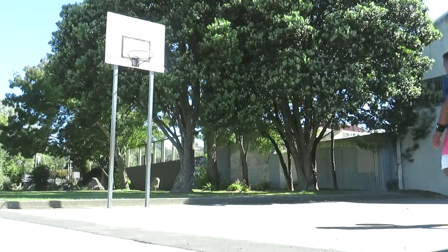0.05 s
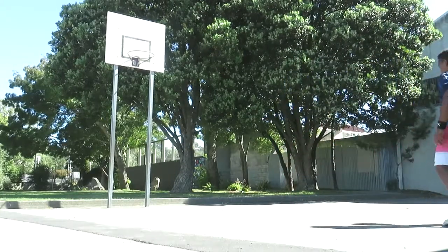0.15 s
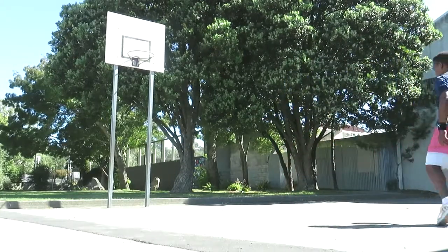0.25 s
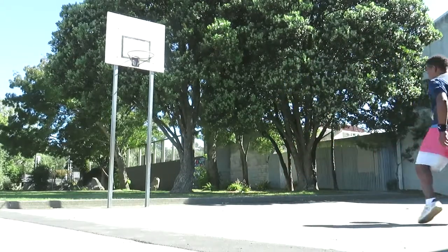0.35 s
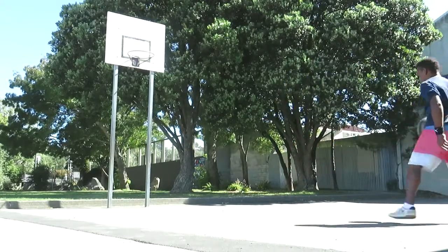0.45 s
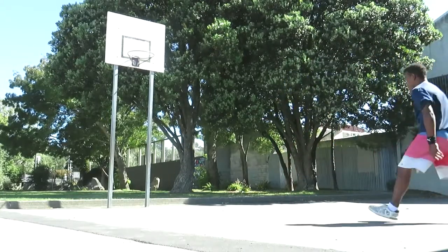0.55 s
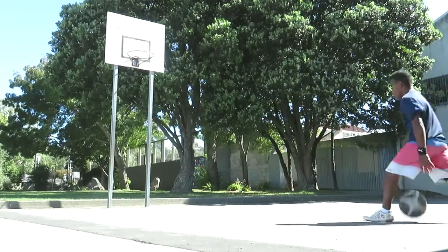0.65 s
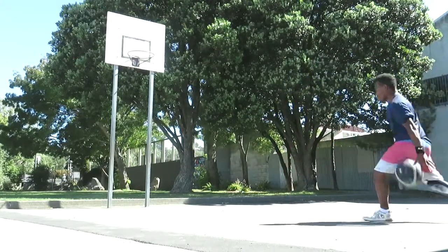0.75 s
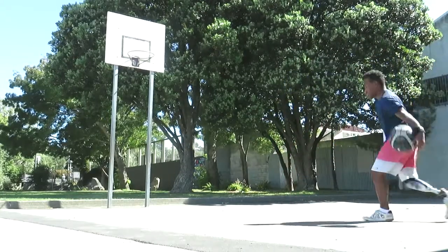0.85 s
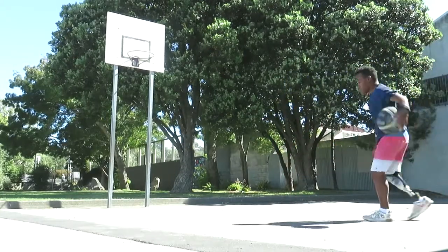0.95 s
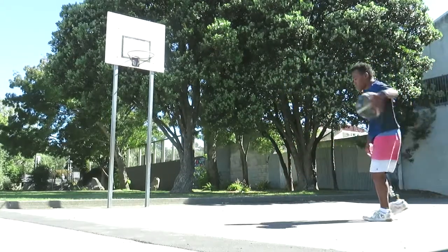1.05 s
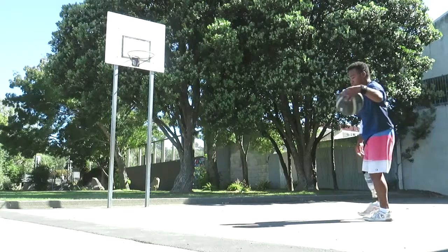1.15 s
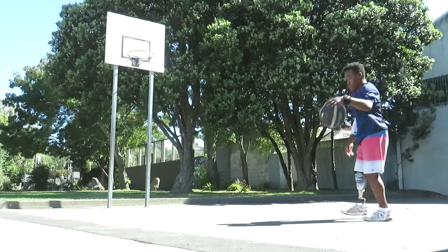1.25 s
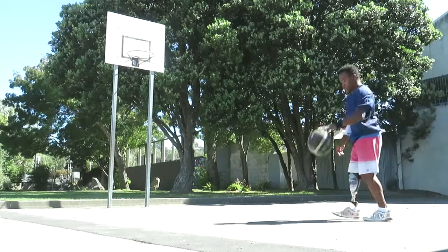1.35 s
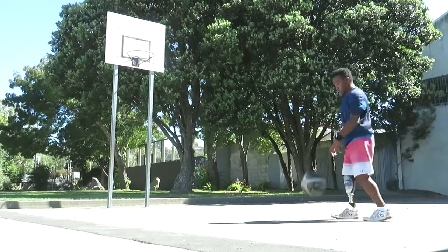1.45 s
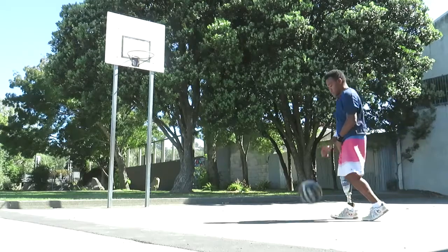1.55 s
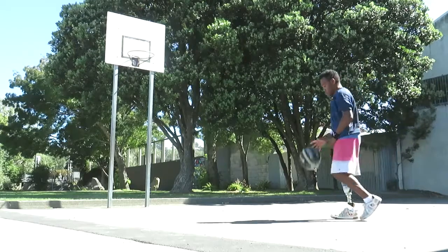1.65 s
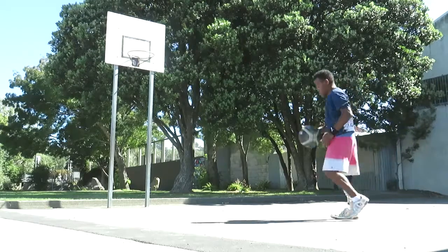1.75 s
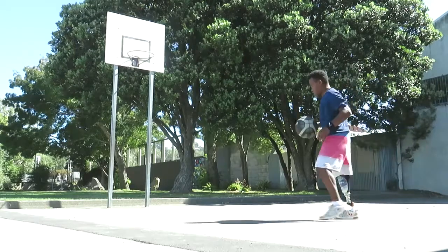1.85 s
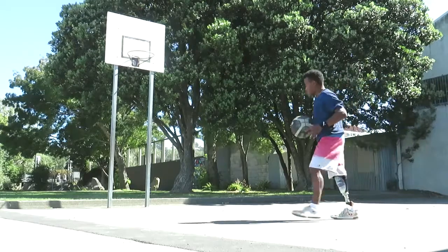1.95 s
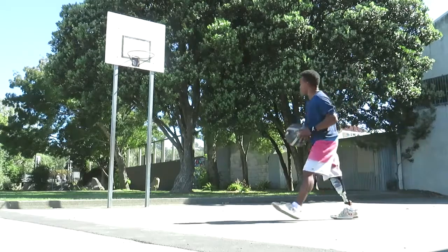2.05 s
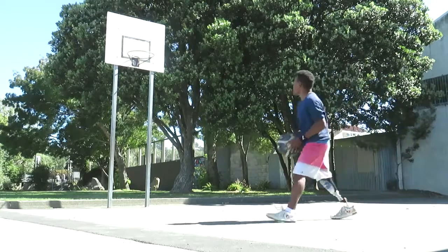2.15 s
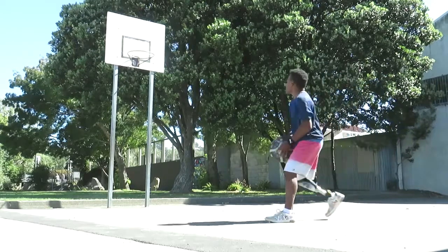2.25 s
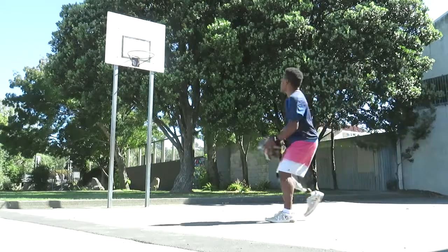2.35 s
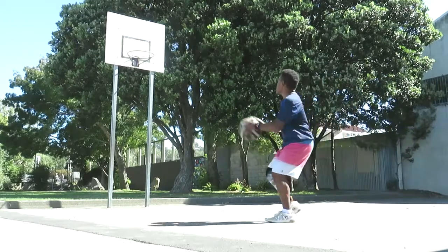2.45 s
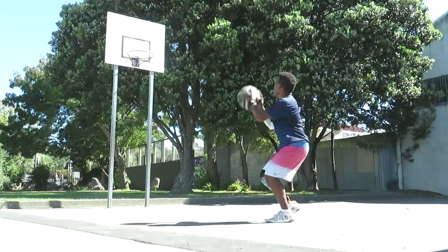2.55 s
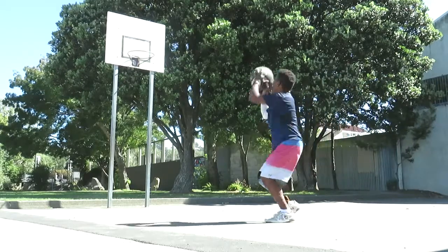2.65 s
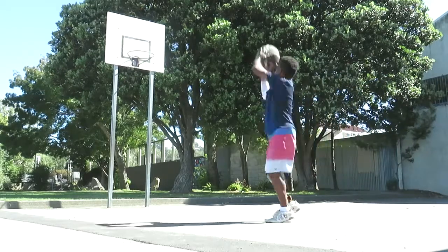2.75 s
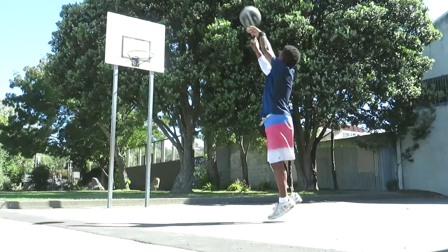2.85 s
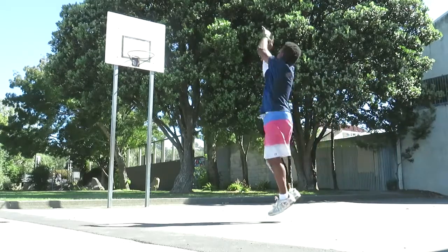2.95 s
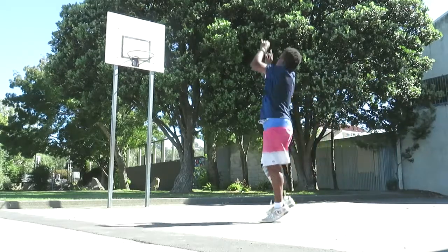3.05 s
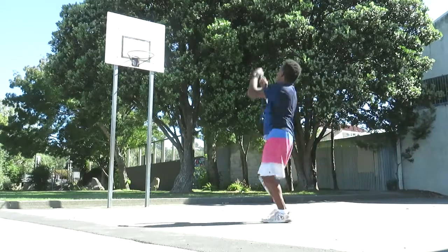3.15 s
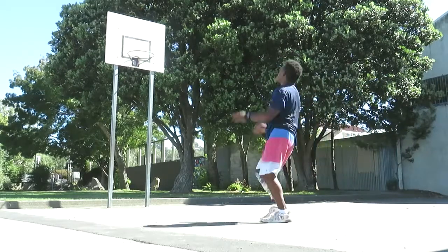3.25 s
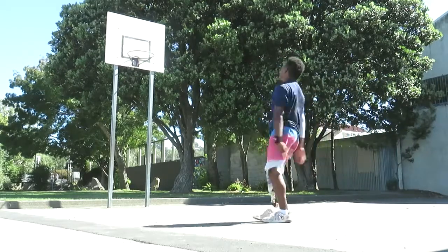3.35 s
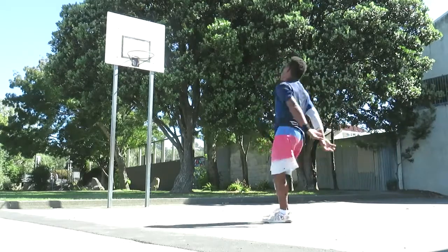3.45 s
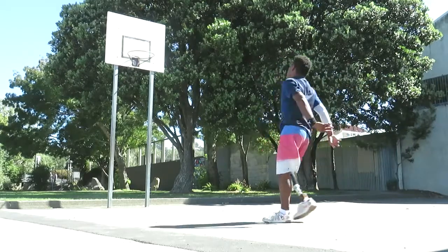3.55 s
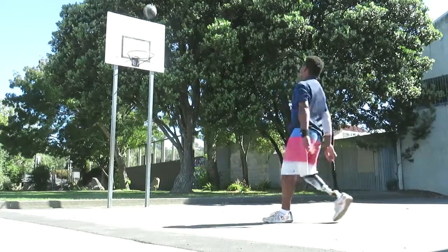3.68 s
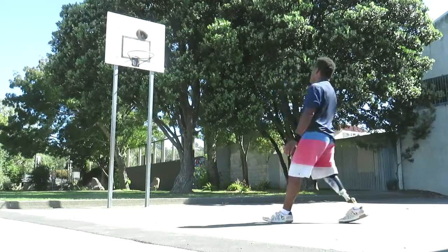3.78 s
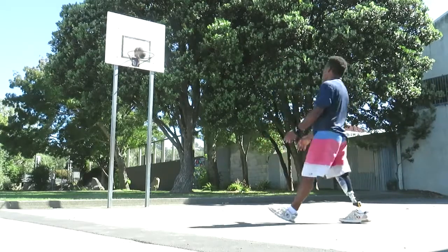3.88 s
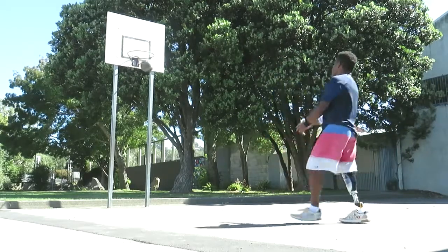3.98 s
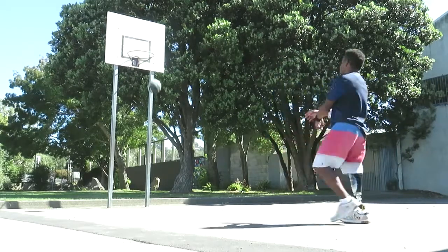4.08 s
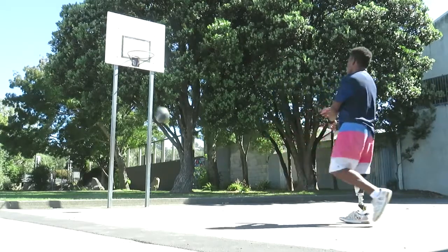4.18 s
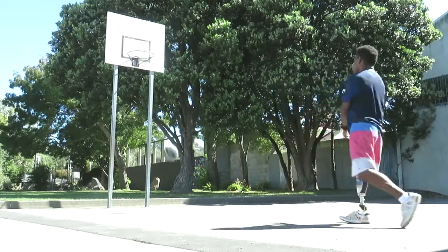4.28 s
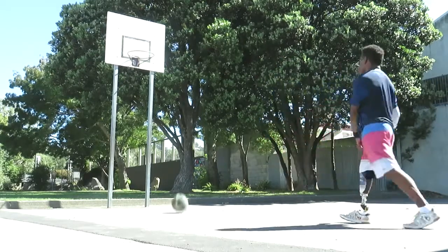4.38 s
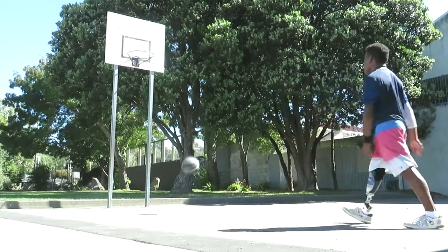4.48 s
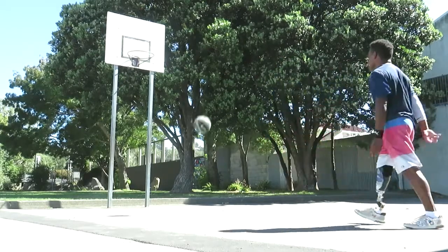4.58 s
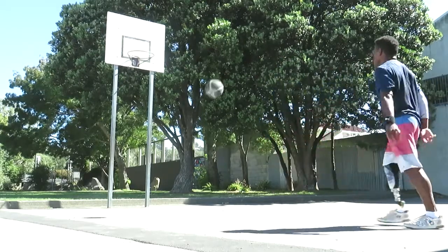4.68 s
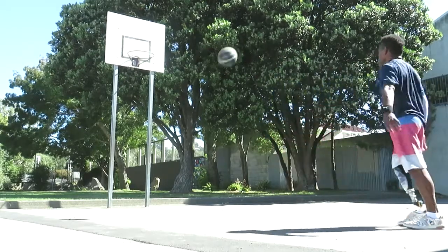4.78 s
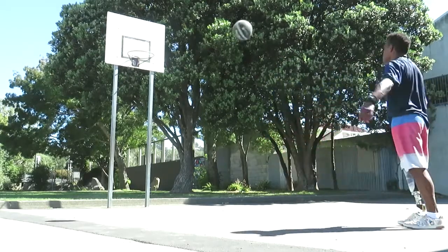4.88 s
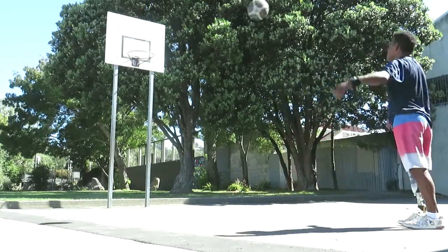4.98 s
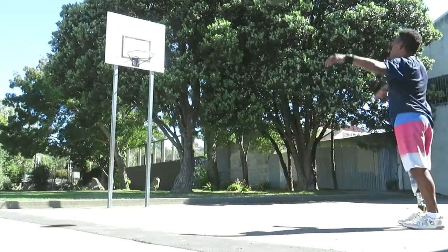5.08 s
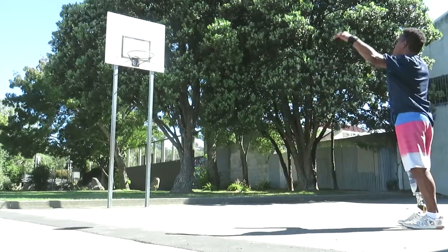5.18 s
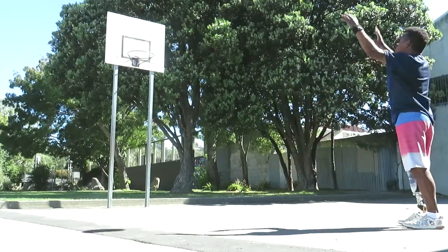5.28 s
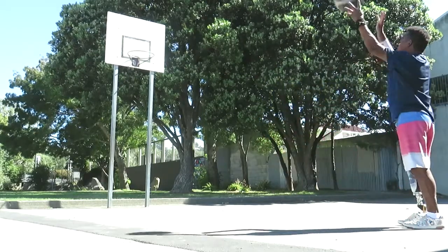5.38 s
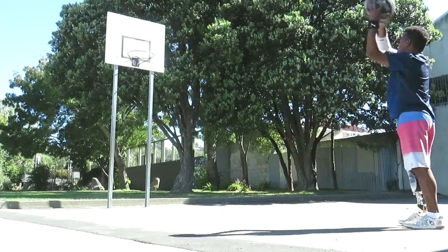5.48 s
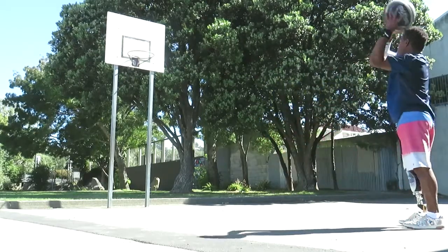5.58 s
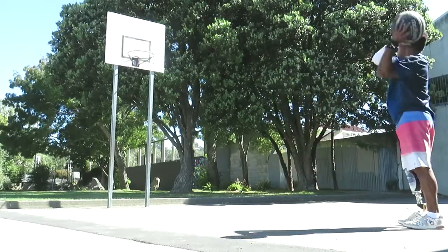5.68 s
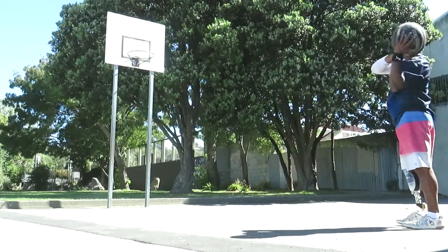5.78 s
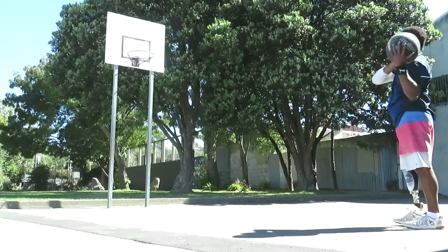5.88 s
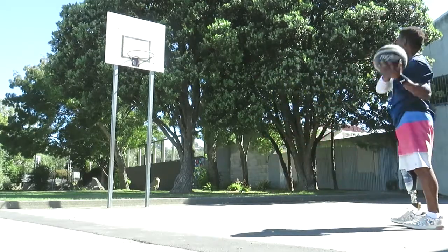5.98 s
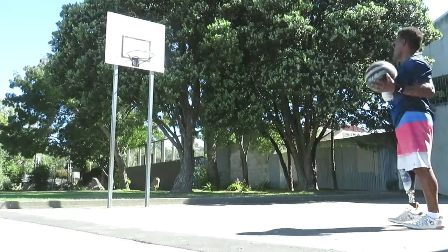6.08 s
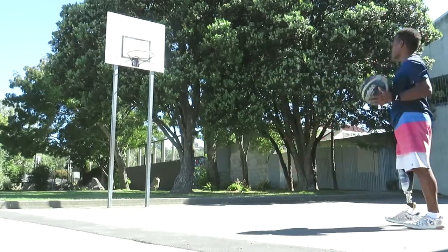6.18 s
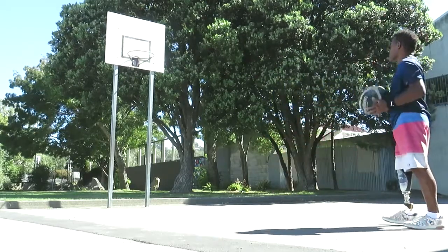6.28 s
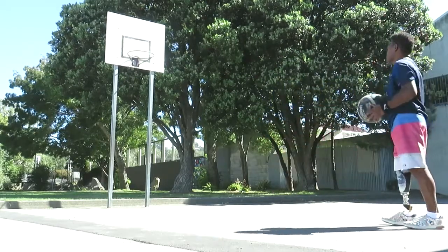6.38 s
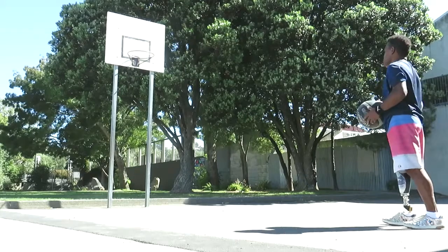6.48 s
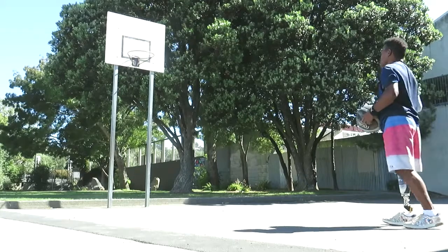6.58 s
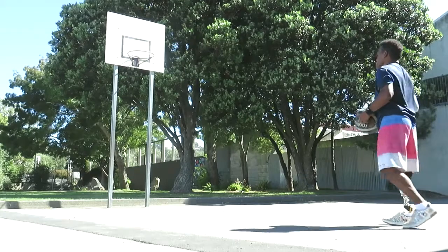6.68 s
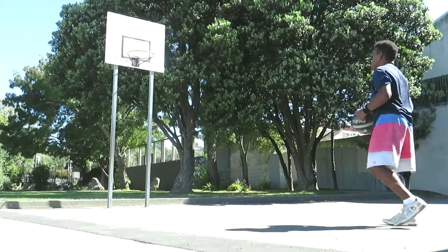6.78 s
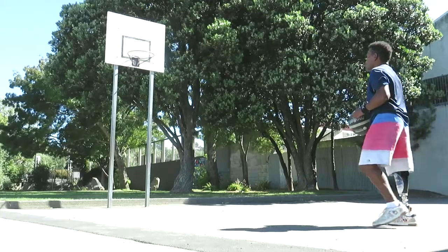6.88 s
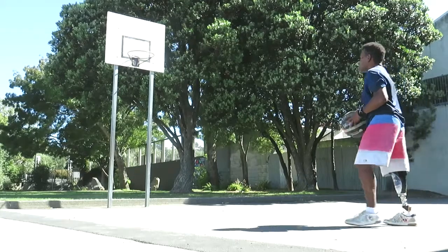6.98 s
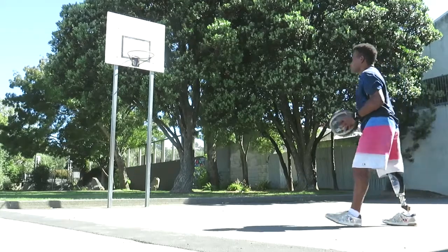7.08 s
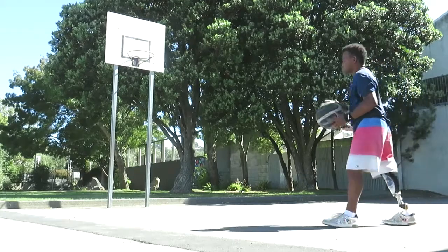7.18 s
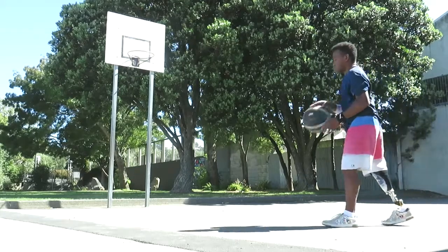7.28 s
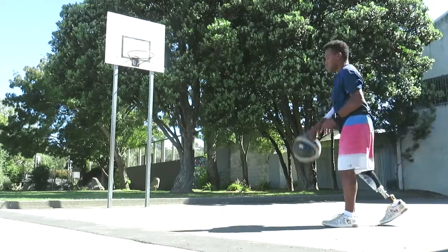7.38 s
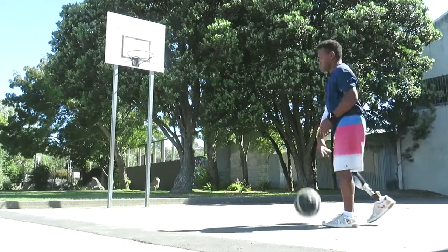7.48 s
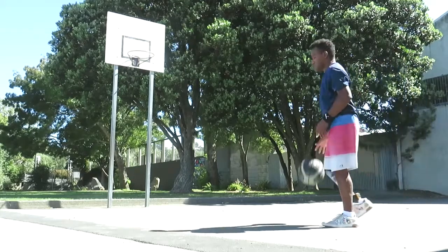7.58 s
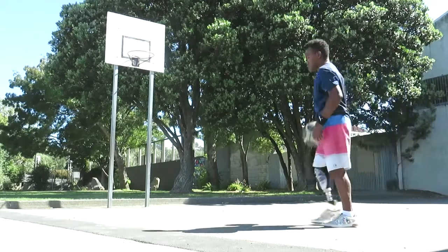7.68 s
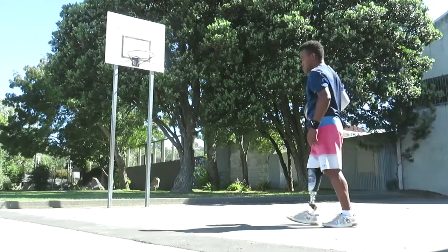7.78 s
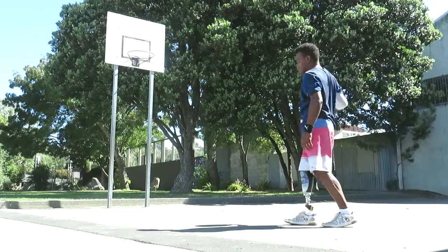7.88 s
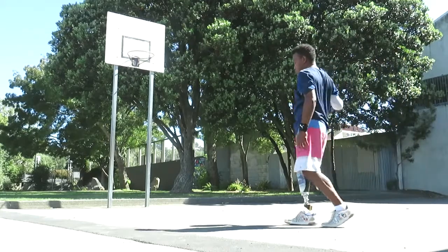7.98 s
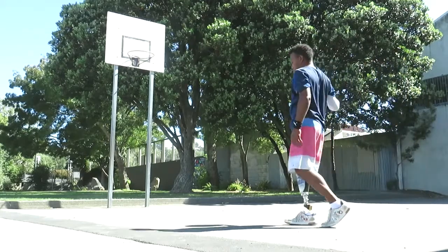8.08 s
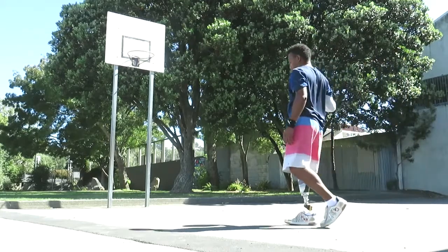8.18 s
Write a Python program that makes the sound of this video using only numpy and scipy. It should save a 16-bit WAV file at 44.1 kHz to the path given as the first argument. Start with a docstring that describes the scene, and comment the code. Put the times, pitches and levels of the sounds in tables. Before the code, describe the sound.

Hard, hollow basketball bounces echo off a nearby wall, with one rattling backboard hit, a hand clap catch, buzzing cicadas and low wind rumble.

```python
"""Basketball on an outdoor asphalt court

The ball bounces twice, strikes backboard and rim, bounces again, is caught, and bounces a last time.
Each hit is built from filtered noise bursts and damped sines; shoes tap and scuff on grit.
A wall behind the court throws bounces, hands and feet back, and trees return a wash.
Shaped noise makes the cicadas that swell and break off in the trees, the distant town rumble,
a thin pulsing hiss at the top of the treble, a brief swish and the gusts that buffet the microphone."""
import sys
import numpy as np
from scipy import signal
from scipy.fft import rfft, irfft
from scipy.io import wavfile

SR = 44100
rng = np.random.default_rng(int(sys.argv[2]) if len(sys.argv) > 2 else 0)


def master(y):
    """Save y as 16-bit WAV."""
    cut = np.clip(np.atleast_2d(y).T, -1, 1)
    pcm = np.round(cut * 32767)  # scale
    wavfile.write(sys.argv[1], SR, pcm.astype(np.int16))


N = 362943
TIME = np.arange(N) / SR  # the whole scene (s)
T = np.arange(SR) / SR  # one second, for single sounds (s)
HZ = np.fft.rfftfreq(N, 1 / SR)

# colour of the court's reflections: freq_hz, level_db
ECHO_COLOUR = [(60, -13), (300, -4), (900, 1), (1600, -2.5), (2600, -4.5), (4200, -6.5), (6500, -16),
               (10000, -27)]


def amp(db):
    """Decibels to gain."""
    return 10 ** (np.asarray(db) / 20)


def evened(x):
    """Scales to rms 1."""
    return x / np.sqrt(np.mean(x ** 2) + 1e-20)


def read(points, hz):
    """Reads a table on a log-frequency axis."""
    f, value = np.transpose(points)
    return np.interp(np.log(hz + 1), np.log(f), value)


def add(mix, s, sound):
    """Mixes a sound in at a time in seconds."""
    part = mix[max(round(s * SR), 0):][:len(sound)]
    part += sound[:len(part)]


def highpass(x, hz, order=1):
    """Takes away the bass below a frequency."""
    return signal.lfilter(*signal.butter(order, hz, "high", fs=SR), x)


def correlated(left, other, likeness):
    """Blends two independent signals into a left-right pair of the given likeness."""
    c = np.clip(likeness, -1, 1)
    return np.array([left, c * left + np.sqrt(1 - c ** 2) * other])


def noise(db, likeness):
    """Spectra of two channels of noise with given levels and left-right likeness."""
    left, other = rfft(rng.standard_normal((2, N)))
    return correlated(left, other, likeness) * amp(db)


def wander(seconds):
    """Slow chance of rms 1 that changes over about the given time."""
    return evened(irfft(rfft(rng.standard_normal(N)) * np.exp(-(HZ * seconds) ** 2), N))


def surge(start, rise, hold, release, power=1):
    """An envelope that climbs, holds and dies away; release is its time constant (s)."""
    age = TIME - start
    return np.clip(age / rise, 0, 1) ** power * np.exp(-np.maximum(age - rise - hold, 0) / release)


def fade(t60):
    """Exponential decay over one second, 60 dB down after t60 seconds."""
    return np.exp(-np.log(1000) * T / t60)


def ring(modes):
    """Damped sines of a struck body, one for each (Hz, dB, t60 s)."""
    return sum(amp(db) * fade(t60) * np.sin(2 * np.pi * hz * T) for hz, db, t60 in modes)


def resonate(x, peaks):
    """Lifts or hollows a sound at each (Hz, width Hz, dB); narrow lifts ring."""
    for hz, width, db in peaks:
        x = x + (amp(db) - 1) * signal.lfilter(*signal.iirpeak(hz, hz / width, SR), x)
    return x


def click(colour, tilt_db=0.0, lag=0.0, size=2048):
    """A causal pulse with a given spectrum and tilt; its bass trails its treble by up to lag seconds."""
    hz = abs(np.fft.fftfreq(size, 1 / SR))
    log_gain = np.log(amp(read(colour, hz) + tilt_db * np.log2((hz + 200) / 1700)))
    # minimum phase keeps the energy at the front
    spectrum = np.exp(signal.hilbert(log_gain).conj())[:size // 2 + 1]
    delay = lag * np.exp(-hz[:len(spectrum)] / 2400)
    turns = (np.cumsum(delay) - delay[0]) * SR / size
    return irfft(spectrum * np.exp(-2j * np.pi * turns))[:size // 2]


def spray(colour, t60, tilt_db=0, per_s=SR):
    """A dying burst of tiny contacts; few per second make it rattle."""
    contacts = rng.standard_normal(SR) * (rng.random(SR) * SR < per_s) * fade(t60)
    contacts /= np.linalg.norm(contacts) + 1e-12
    return signal.fftconvolve(contacts, click(colour, tilt_db))[:SR]


def town():
    """A steady distant rumble: noise that loses level towards the treble."""
    # rumble: freq_hz, level_db_per_hz
    rumble = [(20, -70), (40, -71), (65, -58.5), (110, -61.5), (200, -64.5), (400, -73.5), (800, -78),
              (1500, -87), (3000, -93.5), (5000, -102), (9000, -112), (15000, -114)]
    # how alike left and right are: freq_hz, likeness
    likeness = [(60, 1), (290, 0.99), (700, 0.95), (1400, 0.88), (3100, 0.6), (7000, 1), (15000, 0.23)]
    return irfft(noise(read(rumble, HZ), read(likeness, HZ)), N) * np.sqrt(SR / 2)


def cicadas():
    """Cicadas in the trees to one side: a constant far chorus, and crescendos that break off."""
    # song colour: freq_hz, relative_level_db
    song_colour = [(3800, -23), (5000, -13), (5700, -5.5), (7200, -5.5), (8300, -9), (9500, -23.5),
                   (12000, -18.5), (15000, -15)]
    # phase by which the left port leads: freq_hz, lead_rad
    port_phase = [(20, -5), (4300, 1), (5700, 1.5), (8200, 2.5), (12000, -4)]
    # crescendos: start_s, length_s, peak_db
    phrases = [(0.196, 0.51, -53), (1.537, 1.41, -51.5), (3.3, 0.65, -50.5), (4.834, 1.44, -50),
               (6.345, 1.03, -50.5), (7.864, 0.38, -52.5)]
    crescendo_power, break_off_s = 0.36, 0.16
    chorus_db, flutter_db, flutter_s = -57.5, 0.87, 0.026
    song = noise(read(song_colour, HZ), 0.71)
    song[1] *= np.exp(-1j * read(port_phase, HZ))
    power = amp(chorus_db) ** 2
    for s, length, db in phrases:
        power = power + (amp(db) * surge(s, length, 0, break_off_s, crescendo_power)) ** 2
    return np.sqrt(power) * amp(flutter_db * wander(flutter_s)) * evened(irfft(song, N))


def high_hiss():
    """Thin hiss above 12 kHz, pulsing about ten times a second, in step at both ports."""
    # hiss colour: freq_hz, relative_level_db
    hiss_colour = [(10500, -49), (12000, -21), (13000, -16), (15500, 9)]
    rate_hz, drift_share, sharpness, level_db = 9.8, .04, 3.5, -61
    turns = np.cumsum(rate_hz * (1 + drift_share * wander(.6))) / SR
    pulses = abs(np.sin(np.pi * turns)) ** (2 * sharpness)
    return amp(level_db) * evened(pulses * irfft(noise(read(hiss_colour, HZ), -.5), N))


def swish():
    """A short, thin noise hiss just ahead of the backboard hit."""
    # swish colour: freq_hz, relative_level_db
    swish_colour = [(3800, -28), (4800, -2), (5700, -8), (7000, -12), (10000, -37)]
    hiss = evened(irfft(noise(read(swish_colour, HZ), .8), N))
    return amp(-49) * surge(3.765, rise=0.059, hold=0.028, release=0.038) * hiss


def wind():
    """Lumpy low turbulence, partly separate at the two ports: a breeze, gusts and single eddies."""
    # turbulence colour: freq_hz, relative_level_db
    air_colour = [(20, -12), (55, 2), (110, 3), (200, -8), (320, -13), (500, -34), (900, -39),
                  (3000, -59.5)]
    # how alike the two ports are: freq_hz, likeness
    port_likeness = [(50, .94), (130, .78), (290, .16)]
    # gusts at the microphone: start_s, hold_s, level_db, extra_deep_bass_db
    gust_list = [(0.414, 0.15, -40, 1), (1.25, 0.034, -33.5, -4), (1.907, 0.19, -32.5, 3),
                 (2.041, 0.65, -26, 2.5), (3.656, 0.032, -31.5, 0.5), (4.149, 0.24, -21, -5.5),
                 (4.635, 0.11, -28, -15), (5.906, 0.019, -41, 7), (6.198, 0.11, -34, -0.5),
                 (6.493, 0.76, -44, 3)]
    # single eddies pop on the microphone: start_s, level_db, pitch_hz
    buffets = [(1.942, -17.5, 130), (2.089, -15, 127), (2.171, -15, 164), (2.499, -11, 98),
               (2.69, -16.5, 172), (4.344, -16, 260), (4.716, -19.5, 213), (5.086, -34, 150),
               (5.137, -24.5, 164), (5.153, -14, 155), (5.974, -22.5, 75.6)]
    rise_s, release_s, deep_hz = 0.026, 0.081, 86.5
    breeze_db, lumps_db, lump_s = -57.5, 2.5, 0.033
    air = evened(irfft(noise(read(air_colour, HZ), read(port_likeness, HZ)), N))
    deep = irfft(rfft(air) / (1 + (HZ / deep_hz) ** 4), N)
    power = deep_power = amp(breeze_db) ** 2
    for s, hold, db, deep_db in gust_list:
        gust = amp(db) * surge(s, rise_s, hold, release_s)
        power = power + gust ** 2
        deep_power = deep_power + (amp(deep_db) * gust) ** 2
    gusts = (air - deep) * np.sqrt(power) + deep * np.sqrt(deep_power)
    gusts *= amp(lumps_db * wander(lump_s))
    pops = np.zeros(N)
    for s, db, hz in buffets:
        cycles = hz * T
        envelope = cycles / 0.46 * np.exp(1 - cycles / 0.5)
        add(pops, s, amp(db) * np.sin(2 * np.pi * cycles) * envelope)
    return gusts + pops


def scuffs():
    """A sliding sole catches and slips over the asphalt, setting off small grains of uneven strength."""
    # scrapes: middle_s, length_s, level_db, centre_hz
    strokes = [(0.141, 0.068, -50, 3000), (0.181, 0.059, -40, 900), (0.221, 0.08, -42, 1990),
               (0.993, 0.079, -39, 990), (0.98, 0.052, -53, 4000), (1.315, 0.12, -44.5, 700),
               (1.509, 0.19, -55.5, 4000), (2.504, 0.037, -50, 2000), (3.243, 0.17, -51.5, 1300)]
    # sliding grit: freq_hz, level_db
    scrape_colour = [(150, -7), (600, 6), (1200, 2), (2200, -6.5), (3600, -5), (5500, -6), (9000, -14.5),
                     (15000, -11)]
    grains_per_s, slip_db, slip_s = 6000, 2.5, .005
    out = np.zeros(N)
    for s, length, db, hz in strokes:
        grains = rng.standard_normal(SR) * amp(4 * np.minimum(rng.exponential(1, SR), 3))
        grains *= rng.random(SR) < grains_per_s / SR
        band = signal.butter(1, [hz / 2, min(hz * 2, SR / 2 - 1)], "band", fs=SR)
        grains = signal.fftconvolve(signal.lfilter(*band, grains), click(scrape_colour))[:SR]
        stroke = np.sin(np.pi * np.minimum(T / length, 1))
        add(out, s - length / 2, amp(db) * evened(grains) * stroke)
    slips = evened(amp(slip_db * np.clip(wander(slip_s), -2, 2)))
    return out * slips


def taps():
    """Shoes knock (damped sines) and crunch on grit (noise bursts); hands pat the ball."""
    # contacts: start_s, knock_db, knock_hz, grit_db, grit_t60_s, grit_tilt_db_per_octave
    contacts = [(0.1695, -40, 700, -12, 0.049, 1), (0.982, -24, 1327, -25, .03, 9),
                (1.772, -23, 238, -15, 0.035, -4.5), (2.0872, -12.5, 440, 0, 0.014, -4.5),
                (2.4985, -22, 1072, -11, 0.047, -8), (2.504, -28, 625, -1, 0.083, -5),
                (3.099, -39, 696, -10, 0.034, -6), (3.161, -17.5, 485, -2.5, 0.034, -7),
                (3.1691, -18.5, 403, -16, .02, -10), (3.388, -25, 950, -22, 0.054, -1),
                (3.3947, -25, 550, -9.5, 0.048, -3), (4.806, -44, 814, -6, 0.13, -4),
                (7.1455, -40, 2880, -5, 0.027, 2.5)]
    # crunch colour: freq_hz, level_db
    grit_colour = [(150, -8), (600, 0), (1200, 0), (2200, -2), (3600, -3), (5500, -14), (9000, -27),
                   (15000, -44)]
    # hollow colour of a sole or palm on contact: freq_hz, width_hz, level_db
    sole = [(950, 120, 5), (1400, 300, -6), (1950, 200, 4), (3200, 350, 4)]
    soft_sole_s = .0007
    out = np.zeros(N)
    for s, db, hz, grit_db, t60, tilt_db in contacts:
        knock = ring([(hz, 0, .028), (hz * 0.845, -5, .025)]) - ring([(hz * 1.775, -9, .02)])
        knock *= 1 - np.exp(-T / soft_sole_s)
        crunch = resonate(spray(grit_colour, t60, tilt_db), sole)
        add(out, s, amp(db) * knock + amp(grit_db) * crunch)
    return out


def catches():
    """Soft palms clap on the ball, which rings briefly in the hands."""
    # palm contacts: start_s, ring_db, boom_db, slap_db
    palms = [(5.469, -22, -13.5, 3.5), (5.472, 1.5, -9, -9), (5.4768, -7, -11.5, -4), (5.493, -24, -38, 0),
             (5.4975, -2.5, -17, -4)]
    # ball held in the hands: freq_hz, level_db, t60_s
    held_ball = [(330, -14.5, 0.07), (440, -16, 0.04), (780, -15, 0.024), (955, -17, 0.07),
                 (1185, -19, 0.035), (2200, -42, .07)]
    # clap colour: freq_hz, level_db
    palm_colour = [(100, -4), (400, 4), (1100, 6), (1600, -3), (2300, -4), (4000, -13), (7000, -22),
                   (15000, -42)]
    soft_palm_s, boom_hz = 0.001, 181
    out = np.zeros(N)
    for s, ring_db, boom_db, slap_db in palms:
        ball = amp(ring_db) * ring(held_ball) + ring([(boom_hz, boom_db, .04)])
        clap = amp(slap_db) * spray(palm_colour, 0.03)
        add(out, s, ball * (1 - np.exp(-T / soft_palm_s)) + clap)
    return out


def hoop():
    """The ball booms on the backboard, shakes it on its mounts and rattles the rim."""
    # board and rim contacts: start_s, crack_db, rattle_db, rattle_t60_s, board_db
    hits = [(3.8981, 13.5, 7.5, 0.22, -1.5), (3.9540, -2, 6.5, 0.035, -15), (3.9576, 2, 1, 0.43, -11.5),
            (4.0428, -0.5, -5.5, 0.19, -18.5)]
    # backboard resonances: freq_hz, level_db, t60_s
    board_modes = [(105, -14.5, 0.41), (173.3, -7.5, 0.27), (189, -22, 0.81), (224, -16, 0.26),
                   (264, -23, 0.093), (372, -27.5, 0.39), (466, -21.5, 0.062), (557, -28.5, .16),
                   (1120, -35, 0.087)]
    # the board shakes on its mounts: freq_hz, relative_level_db
    shudder_colour = [(60, -22), (110, -2), (220, 0), (420, -2), (600, -15), (1200, -45), (15000, -80)]
    # crack and rattle colour: freq_hz, level_db
    rattle_colour = [(200, -3), (420, 4.5), (650, -2), (1100, -1), (2000, -3.5), (3300, -5), (5000, -16),
                     (7000, -19.5), (10000, -31), (15000, -40)]
    # resonances and hollows of the steel rim: freq_hz, width_hz, level_db
    rim = [(1070, 70, 8), (1340, 50, 6), (1630, 50, 5), (1890, 50, 6), (2170, 30, 6), (2450, 300, -3),
           (3150, 90, 6), (3950, 350, -10), (4600, 200, 7), (5220, 40, 4), (5500, 300, -6), (5780, 45, 5)]
    steel, board = np.zeros((2, N))
    for s, crack_db, rattle_db, t60, board_db in hits:
        add(steel, s, amp(crack_db) * click(rattle_colour, lag=0.00156))
        add(steel, s, amp(rattle_db) * spray(rattle_colour, t60, tilt_db=-2, per_s=1500))
        shudder = amp(29.5) * spray(shudder_colour, t60=0.58)
        add(board, s, amp(board_db) * (ring(board_modes) + shudder))
    # an open board radiates little deep bass
    return highpass(resonate(steel, rim) + board, 85, order=2)


def dribbles():
    """The ball slaps asphalt, rings hollow, squashes and lifts off; gives direct, all-round, wall sound."""
    # ball on asphalt: start_s, slap_db, slap_tilt_db_per_octave, thump_db, thump_hz, contact_s,
    # lift_off_db, boom_hz, boom_db, wall_echo_db, wall_delay_s, ping_db
    bounces = [(0.7122, 15.5, -1.5, -5.5, 119, 0.013, -7.5, 240, -14.5, 0, 0.064, -15),
               (1.557, 12.5, 2, -5, 103, 0.012, -7, 358, -13.5, 2, 0.0705, -11.5),
               (4.4501, 16.5, 0.8, -5, 140, .0115, -3, 272, -8.5, -2, .0646, -5),
               (7.5549, 17.5, 1.3, -4.5, 114, 0.012, -17, 289, -13.5, -2.5, 0.0735, -14)]
    # slap colour: freq_hz, level_db
    slap_colour = [(80, -30), (300, -7), (700, 2.5), (1100, 3.5), (2000, 0), (3200, -4), (4600, -12.5),
                   (6300, -17), (9500, -34), (15000, -38)]
    # hollow resonances, driven anew as each bounce lands on another patch, before damping and depth:
    # freq_hz, width_hz, level_db in the 1st, 2nd, 3rd and 4th bounce
    shell = [(669.0, 30.0, 6.5, 9.5, 9.0, 8.5), (789.0, 30.0, 3.0, 3.5, 11.5, 5.5),
             (902.0, 39.0, 10.5, 14.5, 6.5, -7.5), (1206.0, 37.0, -6.5, 11.0, 10.0, 4.0),
             (1372.0, 198.0, 3.0, 8.0, -3.5, -10.0), (1645.0, 47.0, 9.0, -10.5, 6.5, 11.0),
             (2114.0, 135.0, 4.0, 3.0, -0.5, -6.0), (2356.0, 115.0, -3.5, 5.0, 5.5, 1.0),
             (2580.0, 153.0, 5.0, 2.0, -8.0, 0.0), (2965.0, 295.0, -3.0, 6.0, -6.0, 2.5),
             (3371.0, 145.0, 4.5, -1.5, 2.5, 5.0), (4345.0, 177.0, -3.0, 4.5, 3.5, -1.5)]
    # air inside the ball: freq_hz, level_db, t60_s
    cavity = [(790, -35, .35), (1150, -42, .2), (1690, -47, .4), (2832, -49, 9)]
    # the rubber's damping widens every resonance; depth towards the microphone and all around (share)
    squash_width_hz, shell_depth, spread_depth = 26, .8, .4
    spread_db = 2.5  # slap sent all around, against the direct one
    # the slap crosses the air inside the ball and returns inverted: time for each bounce, share
    round_trip_s, return_share = [.0016, .00125, .0016, .0014], .45
    spin_hz, spin_null_s, ping_lasts_s = 1.62, .045, .72
    near, around, from_wall = np.zeros((3, N))
    for k, bounce in enumerate(bounces):
        s, slap_db, tilt_db, thump_db, thump_hz, contact = bounce[:6]
        lift_db, boom_hz, boom_db, wall_db, wall_delay, ping_db = bounce[6:]
        # grit crunches under the ball
        slap = amp(-20) * spray(slap_colour, 0.026, tilt_db + 5)
        # bending waves in the shell carry the treble out first
        add(slap, 0, -click(slap_colour, tilt_db, lag=0.00074))
        slap = amp(slap_db) * slap
        # summed over all directions the hollow colour evens out
        all_round = [(hz, width + squash_width_hz, spread_depth * drive[k]) for hz, width, *drive in shell]
        spread = amp(spread_db) * resonate(slap, all_round)
        add(slap, round_trip_s[k], -return_share * highpass(slap, 300))
        forward = [(hz, width + squash_width_hz, shell_depth * drive[k]) for hz, width, *drive in shell]
        slap = resonate(slap, forward)
        squash = np.maximum(T - .0012, 0)
        swell = squash / 0.0028
        thump = -amp(thump_db) * swell * np.exp(1 - swell) * np.sin(2 * np.pi * thump_hz * squash)
        lift_off = -amp(lift_db) * np.exp(-((T - contact) / 0.00088) ** 2)
        # the ball spins, so the ping of the air inside swells and fades
        spin = np.sin(2 * np.pi * spin_hz * (T - spin_null_s)) ** 3
        ping = amp(ping_db) * ring(cavity) * spin * np.exp(-(T / ping_lasts_s) ** 6)
        low = highpass(thump + lift_off + ring([(boom_hz, boom_db, .06)]), 25)
        add(near, s, slap + low + ping)
        add(around, s, spread + low)
        add(from_wall, s + wall_delay, amp(wall_db) * (spread + low))
    return near, around, from_wall


def reflect(x, envelope, t60, likeness):
    """Scattered reflections under an envelope, each band dying at its own speed."""
    reflections_per_s = 3000
    left, other = rng.standard_normal((2, SR)) * (rng.random(SR) < reflections_per_s / SR)
    hz, t, z = signal.stft(correlated(left, other, likeness), SR, nperseg=256)
    z = z * np.exp(-np.log(1000) * t / read(t60, hz)[:, None])
    taps_in_time = signal.istft(z, SR, nperseg=256)[1][:, :SR] * envelope
    # rms gain 1 from 500 to 3000 Hz, ahead of the colour
    taps_in_time /= np.sqrt(np.mean(abs(rfft(taps_in_time[0])[500:3000]) ** 2))
    coloured = signal.fftconvolve(taps_in_time, click(ECHO_COLOUR)[None], axes=1)
    return signal.fftconvolve(x[None], coloured, axes=1)[:, :N]


def scene():
    """Direct hits, near reflections, the wall's slap-back, the wash from the trees and the background."""
    # decay of scattered reflections: freq_hz, t60_s
    court = [(100, 1), (500, 0.59), (1200, 0.63), (3000, 0.53), (6000, 0.9), (12000, 0.033)]
    wall_delay_s, hands_wall_db, feet_wall_db, feet_bass_cut_hz = .072, 3.5, 1.5, 800
    close_wall_s, close_wall_db = 0.029, -23
    trees_build_s = .085
    ball, around, from_wall = dribbles()
    hands, feet = catches(), taps() + scuffs()
    feet_return = amp(feet_wall_db) * highpass(feet, feet_bass_cut_hz)
    add(from_wall, wall_delay_s, amp(hands_wall_db) * hands + feet_return)
    others = hands + feet + hoop()
    dry, outward = ball + others, around + others
    near = amp(-12.0) * reflect(outward, (T > .006) * fade(0.11), court, 1.0)
    # the wall returns one clear echo, then scatter from the fence and shed
    echo = amp(-20) * signal.fftconvolve(from_wall, click(ECHO_COLOUR))[:N]
    # a small early reflection of each bounce
    early = np.pad(click(ECHO_COLOUR, 1.8), (round(close_wall_s * SR), 0))
    echo += amp(close_wall_db) * signal.fftconvolve(around, early)[:N]
    scatter = amp(-14.5) * reflect(from_wall, fade(0.05), court, 0.95)
    trees = amp(-15.0) * reflect(outward, np.minimum(T / trees_build_s, 1), court, 0.96)
    # the ports hear the treble slightly apart
    apart = amp(-4.0) * np.gradient(dry)
    direct = np.array([dry - apart, dry + apart])
    background = town() + cicadas() + high_hiss() + swish() + wind()
    return direct + near + echo + scatter + trees + background


def record(dry):
    """The loudest peaks overload, the top octave rolls off, then the band limit."""
    clipped = signal.lfilter(*signal.butter(2, 10000, fs=SR), np.clip(dry, -1, 1))
    band_limit = signal.firwin(511, 15800, window=("kaiser", 9), fs=SR)
    return signal.oaconvolve(clipped, band_limit[None], "same")


dry = scene()
out = record(dry)
master(out)
```